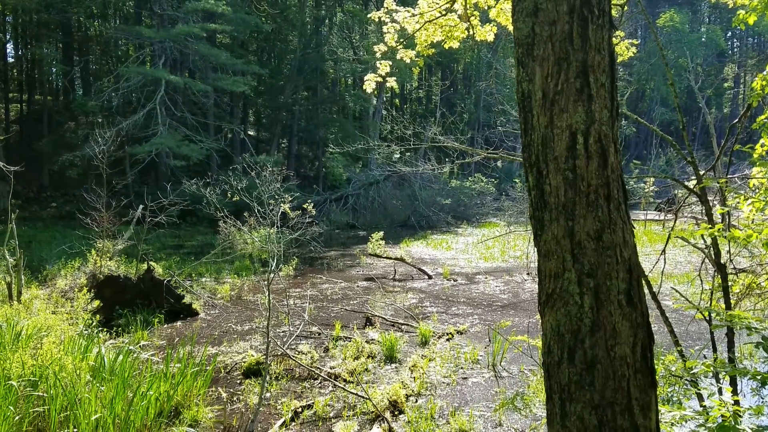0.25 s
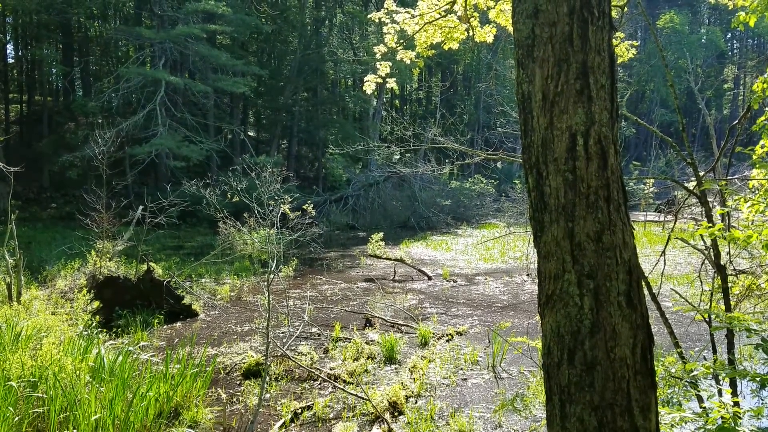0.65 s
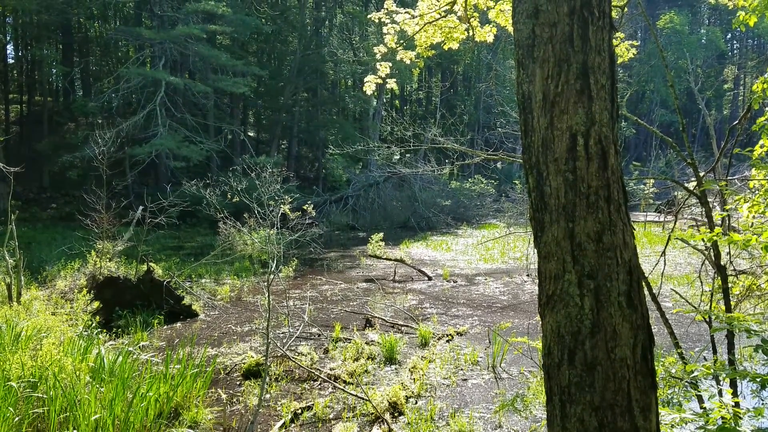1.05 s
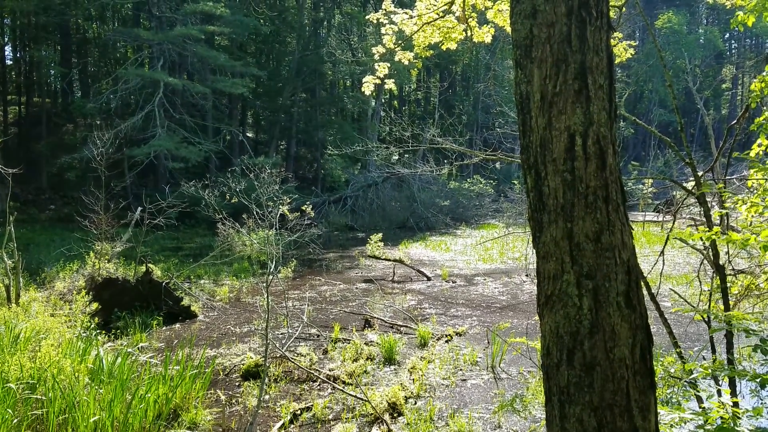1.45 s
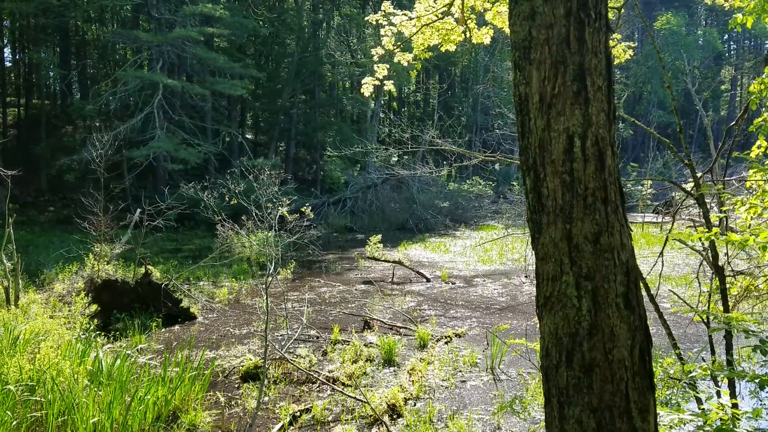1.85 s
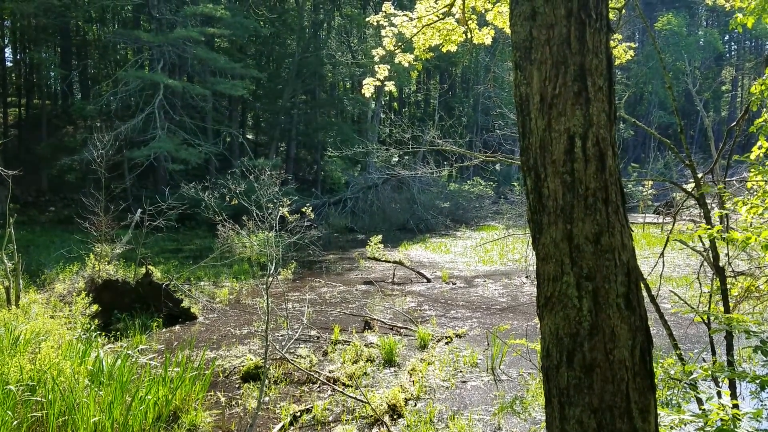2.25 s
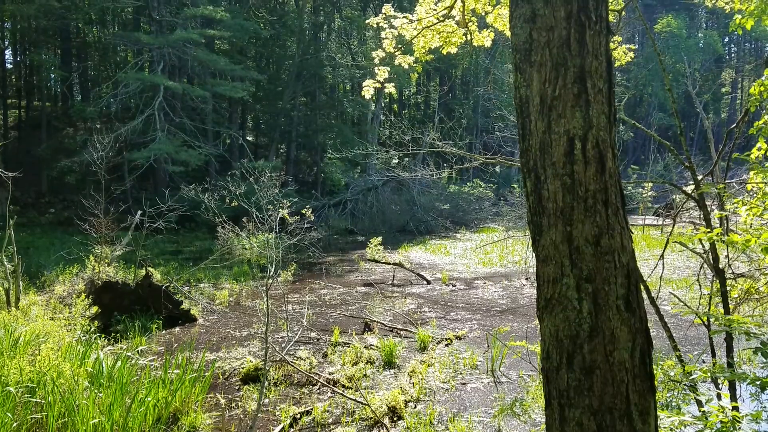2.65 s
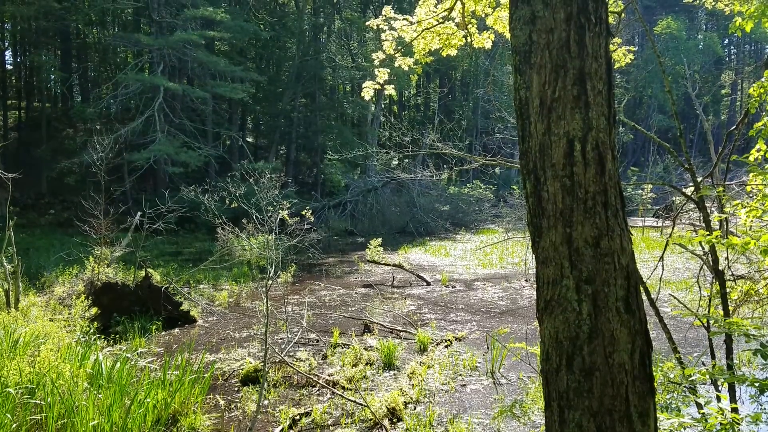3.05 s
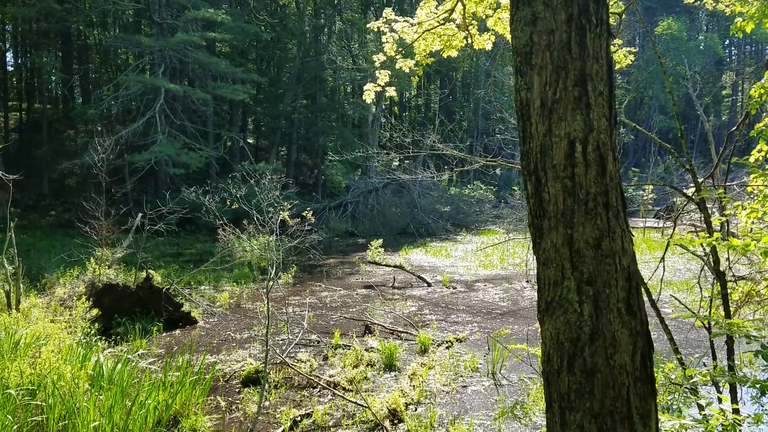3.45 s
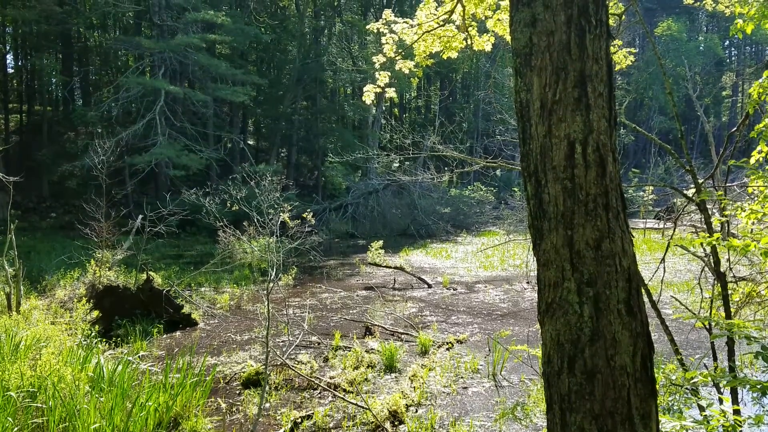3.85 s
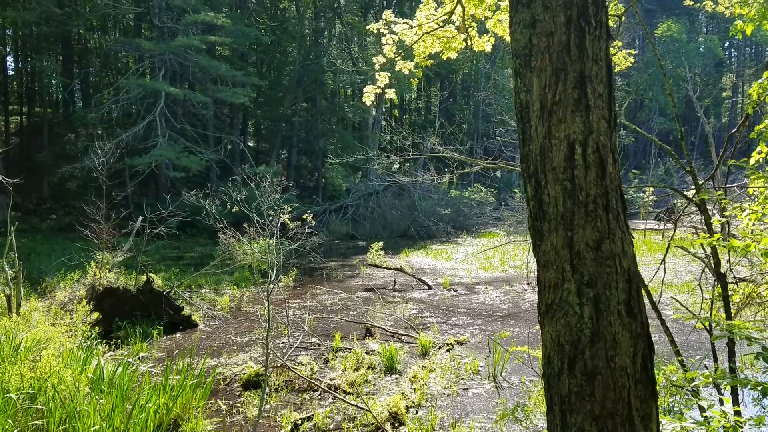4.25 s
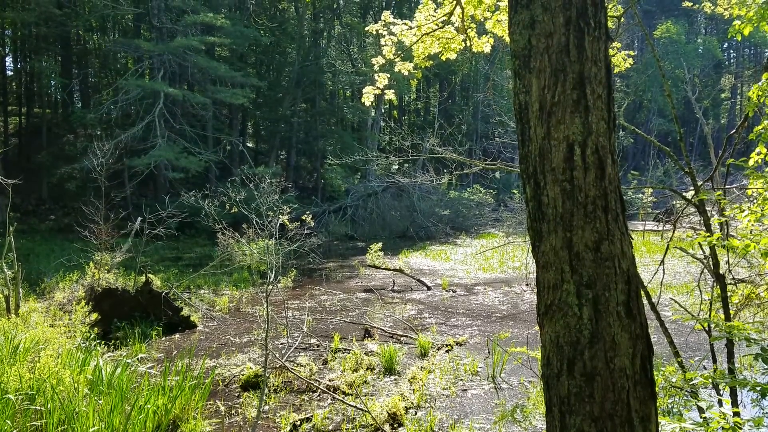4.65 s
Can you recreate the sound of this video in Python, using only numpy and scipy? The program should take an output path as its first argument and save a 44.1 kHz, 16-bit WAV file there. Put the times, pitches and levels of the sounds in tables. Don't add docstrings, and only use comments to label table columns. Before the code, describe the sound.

In a wooded swamp, low airy rumble and soft leaf hiss sit under a faint, wavering propeller-plane drone that grows slightly while its pitch sags. From about 0.35 s a songbird repeats very faint, quick falling notes, about eight a second, with small arched whistles near 0.15 and 0.9 s. A tree frog dominates: thirteen rapid pulses from 1.1 to 1.9 s, starting weakly; seventeen from 2.1 to 3.2 s; eight from 3.6 to 4.0 s. Each pulse is a short, slightly raspy upward chirp near 1 kHz, about fifteen per second, echoing diffusely off trunks. The falling bird notes strengthen from 2.2 to 3.4 s, with irregular chips between 2.0 and 3.6 s. From 3.7 s another bird repeats high hooked whistles with doubled ticks four times a second, and faint distant whistles cluster around 4 to 4.7 s. A tiny dry tick hits the stereo microphone housing at 4.8 s.

```python
import sys
import numpy as np
from scipy import signal
from scipy.fft import next_fast_len
from scipy.io import wavfile

SR = 44100
rng = np.random.default_rng(int(sys.argv[2]) if len(sys.argv) > 2 else 0)


def makeup_ratio(level_db):
    decades = np.asarray(level_db, float) / 20
    return 10 ** decades


def int16_out(signal):
    q = np.round(np.clip(np.atleast_2d(signal).T, -1, 1) * 32767)
    wavfile.write(sys.argv[1], SR, q.astype(np.int16))


N = 217057

# frequency in Hz, density in dB per Hz.
AIR_SPECTRUM = [(20, -23), (120, -13.5), (320, -10.5), (700, -17.5), (2500, -22.5), (6500, -34),
                (10000, -37.5), (15700, -31.5)]
# frequency in Hz, correlation from -1 to 1.
AIR_LIKENESS = [(60, 1), (180, 0.8562), (550, 0.5507), (1650, -0.3509), (4970, 0.2741), (15000, -0.1208)]
# frequency in Hz, left minus right in dB.
AIR_BALANCE = [(60, -7), (240, -4), (950, -2), (3770, 0.5), (15000, -1.5)]
AIR_DB = -63.5
RUMBLE_DB_PER_S = 0.7338
BREEZE_S, BREEZE_WIDTH_S, BREEZE_DB = 2.8957, 1.2428, 2

# time in seconds, rate in Hz.
BLADE_RATE = [(0, 105.1), (2.5, 101.5), (4.92, 94.7)]
# multiple of the blade rate, level in dB, waver in Hz.
DRONE_ORDERS = [(1, 0.5225, 11.19), (2, -16, 36), (3, 0, 11.72), (3.5, 1.5, 19.88)]
# time in seconds, peak in dB, half width in seconds.
EXHAUST_SWELLS = [(.41, -64.5, 0.0321), (.69, -62, 0.0351), (.86, -61, 0.0231), (1.56, -62.5, 0.0348),
                  (1.76, -57, 0.0204), (2.19, -56, 0.0379), (2.29, -53.5, 0.03374), (2.5, -53.5, 0.12123),
                  (2.66, -63, 0.0538), (2.9, -61, 0.1036), (3.13, -56, 0.03617), (3.29, -58.5, 0.02936),
                  (3.48, -57, 0.02138), (3.89, -61.5, 0.028), (4.202, -51, 0.05704), (4.42, -55.5, 0.06793),
                  (4.86, -57, 0.06215)]
FADED_DB = -69.5
DRONE_DB, NEARING_DB_PER_S = -66.5, 1.129

# time in seconds, pitch in Hz, rms level in dB.
ARCHED_WHISTLES = [
    [(0.14, 4067, -90), (0.154, 4490, -68.5), (0.186, 4844, -83), (0.214, 4874, -68.5),
     (0.225, 4890, -84.5)],
    [(0.84, 4233, -73.5), (0.864, 4647, -64.5), (0.882, 4723, -65), (0.896, 4657, -63.5),
     (0.915, 4278, -64.5)],
    [(0.95, 4313, -75), (0.965, 4562, -63), (0.995, 4790, -72), (1.03, 4687, -70.5), (1.09, 4245, -79.5)],
]
# start in seconds, length in seconds, from Hz, to Hz, rms level in dB.
FAR_GLIDES = [(.26, .16, 5650, 5620, -86.5), (1.145, .4, 3230, 3410, -83), (1.5, 0.4945, 3425, 3796, -81.5),
              (1.93, 0.3198, 3759, 3920, -78), (3.96, 0.13784, 3975, 3863, -67.5),
              (3.976, .13, 3686, 3570, -69), (4.19, 0.065, 3571, 3573, -70.5),
              (4.235, 0.0917, 3853, 3688, -69), (4.447, 0.21613, 3333, 3309, -74),
              (4.374, 0.2996, 2775, 2664, -77.5), (4.637, .27, 2376, 2332, -72.5)]

# band centre in Hz, 60 dB decay time in seconds, level in dB.
WOOD_DECAY = [(955.55, 1.1339, -4.5), (1910, 1.1127, 0.8755), (3250.2, 0.9663, 2), (4802.3, 0.8077, 3.5869),
              (7647, 0.3452, 2)]
# resonance in Hz, sharpness (Q), share added.
FROG_OFF_AXIS = [(1051.7, 9.59, -0.4822), (1713.4, 4.724, -0.3233), (2003, 15.814, -0.84135),
                 (2060.8, 11.374, 0.1815)]

# time from the note in ms, pitch in Hz, level in dB, left minus right in dB,
# left lead in radians.
SHORT_SLIDE = [(-13, 6100, -25, -1, .5), (-8, 5400, -6, -1, .5), (0, 4540, 0, -1, .5),
               (9, 3800, -3, -1, .5), (14, 3500, -25, -1, .5)]
SLIDE = [(-30, 8600, -34, 0, .5), (-24, 7600, -16, 0, .5), (-15, 6000, -10, -1, .5), (0, 4540, 0, -1, .5),
         (9, 3750, -3, -1, .5), (15, 3300, -10, -1, .5), (20, 3000, -26, 0, .5)]
CHIP = [(-7, 2380, -25, 0, 1.), (-3, 2410, -3, 0, 1.), (1, 2480, 0, 0, 1.), (4, 2700, -9, 0, 1.),
        (11, 3300, -15, 0, 1.), (15, 3500, -28, 0, 1.)]
TICK = [(-6, 10000, -25, 3, 1.1), (-4, 9400, -4, 3, 1.5), (0, 7900, 0, 3, 2.7), (3, 6900, -2, 3, 3.9),
        (7, 6200, -4, 3, 4.4), (10, 5800, -25, 3, 4.5)]
HOOK_DOWN = [(-75.5, 9900, -35.5, 0, 3.027), (-71, 9000, -7.5, 1.5, 1.47), (-63.5, 6600, -5.5, -5.5, 1.855),
             (-58, 5500, 2.5, -2.5, 5.071), (-45, 4650, -0.5, 1, 4.386), (-31.5, 4050, 7, 3, 5.404),
             (-32.5, 5500, -32, 2.5, 6)]
HOOK_UP = [(-19.5, 3300, -12.5, 12, 5), (-13, 3450, 3.5, 4.5, 4.092), (0, 4220, 1.5, 5, 5.52),
           (13.5, 5200, -0.5, -3.5, 5.255), (28.5, 4900, -37, -7, 5.8)]
FLICK = [(-23, 5600, -25.5, 0, 0.857), (-14.5, 6200, -6, 0.00027, 0.97), (-8, 6620, -1.5, 0.00052, 1.),
         (6, 6720, -1.5, 0.00009, 1.), (11, 5400, -26, 0, 1.)]

# time in seconds, peak level in dB; chips add a pitch ratio.
SHORT_SLIDE_NOTES = [(.357, -74), (.54, -79), (.666, -73), (.797, -71), (.925, -72), (1.06, -78),
                     (1.189, -70), (1.313, -71), (1.438, -64), (1.563, -70), (1.687, -66), (1.815, -67),
                     (1.94, -65), (2.064, -63)]
SLIDE_NOTES = [(2.189, -58), (2.307, -55.5), (2.427, -55.5), (2.545, -53.5), (2.669, -55), (2.791, -54),
               (2.912, -55), (3.032, -53), (3.152, -55), (3.274, -57), (3.395, -56)]
CHIP_NOTES = [
    (2.032, -51.5, 1.0447),
    (2.384, -47.5, 1.0143),
    (2.687, -48.5, 1.0993),
    (2.93, -43.5, 1.1194),
    (3.198, -46, 1.11),
    (3.584, -51, 1.0842),
]
PECK_NOTES = [
    (2.586, -65.5),
]
HOOK_NOTES = [
    (3.67, -64.5),
    (3.912, -59.5),
    (4.151, -58),
    (4.395, -58.5),
    (4.641, -57.5),
    (4.89, -57),
]
TICK_NOTES = [
    (3.753, -71),
    (3.992, -65.5),
    (4.236, -64),
    (4.481, -64.5),
    (4.727, -64),
]
FLICK_NOTES = [
    (3.812, -63),
    (3.903, -61.5),
]
TICK_GAP_S = .0225

# time from the peak in ms, pitch in
# Hz, then fundamental, second and third partial in dB.
PULSE = [(-28, 832.3, -38.5, -27.5, -56), (-23.5, 880, -22.5, -10, -41), (-16, 925, -16.5, -12, -35.5),
         (-9.5, 979.07, -7, -0.5, -23.5), (-4, 1010.1, -5.5, -4, -26.5), (0.0709, 1081.9, -0.5, -16, -26.5),
         (1.7576, 1095.7, -4, -13.5, -29), (3, 1049.4, -20.5, -6.5, -33), (7, 995.6, -60.5, -16.5, -49.5)]
# frequency in Hz, left minus right in dB, left lead in radians.
FROG_SIDE = [(900, -2.5, .8), (1100, -3.5, .8), (1720, 1.5, 1.4), (1900, .6, 2.1), (1990, .6, 2.6),
             (2160, -1.5, 1.3), (3000, -3, 2.2)]
# delay in ms, left level in dB, right level in dB.
FROG_ECHOES = [(4.643, -17.5, -12), (13.612, -12.5, -21.5), (30.807, -18, -23.5)]
# first peak in seconds, number of pulses, steady gap in ms, wait after the first in ms,
# wait before the last in ms.
TRILLS = [
    (1.0856, 13, 64.56, 3.9, 17.6),
    (2.1402, 17, 65.51, 8, 5.1),
    (3.5604, 8, 63.8, 5.2, 2.1),
]
# full level in dB, shortfall at the start in dB, overtones in dB,
# share of the glide in the opening pulse.
EFFORT = [
    (-31, 10, -5, 0.84015),
    (-30.5, 1, -4, .8),
    (-31.5, 0, -6, 0.34623),
]
HURRY_MS, SETTLE_PULSES = 6.7, 1.95
WARM_PULSES, UNEVEN_DB = 2.6, 0.6489
FIRST_DULL_DB, LAST_DULL_DB = 8.5, 1
LAST_PUSH_DB = 0.7936
RISE_FULL, RISE_SHORT = 1.15, .25
HOME_HZ, RASP_DB = 1044.7, 1.6592

# time in seconds, peak level in dB, decay in ms.
HOUSING_TICK = (4.8012, -35.5, .7)


def at_hz(points, hz):
    table_hz, values = np.transpose(points)
    return np.interp(np.log(hz), np.log(table_hz), values)


def rms_one(x):
    return x / np.sqrt(np.mean(np.abs(x) ** 2) + 1e-20)


def drift(rate_hz):
    r = np.exp(-2 * np.pi * rate_hz / SR)
    noise = rng.standard_normal(N + SR)
    return rms_one(signal.lfilter([1], [1, -2 * r, r * r], noise)[SR:])


def add(out, start_s, phase, level_db, pan_db, lead):
    i = round(start_s * SR)
    left = makeup_ratio(level_db + pan_db / 2) * np.sin(phase + lead)
    right = makeup_ratio(level_db - pan_db / 2) * np.sin(phase)
    out[:, i:i + len(phase)] += np.array([left, right])[:, :N - i]


def on_samples(shape):
    ms, *columns = np.transpose(shape)
    fine = np.arange(ms[0], ms[-1], 1000 / SR)
    return ms[0] / 1000, [np.interp(fine, ms, column) for column in columns]


def air(patchy_db):
    t = np.arange(N) / SR
    rumble_db = RUMBLE_DB_PER_S * t
    hiss_db = BREEZE_DB * np.exp(-((t - BREEZE_S) / BREEZE_WIDTH_S) ** 2)
    edges = 20 * 2 ** np.arange(0, 9.9, 1 / 3)
    white = rng.standard_normal((2, 2, N))
    out = 0
    for k, (low, high) in enumerate(zip(edges, edges[1:])):
        band = signal.butter(2, [low, high], "band", fs=SR, output="sos")
        mid, side = signal.sosfilt(band, white[k % 2])
        hz = np.sqrt(low * high)
        alike = np.clip(at_hz(AIR_LIKENESS, hz), -1, 1)
        lean_db = at_hz(AIR_BALANCE, hz) / 2
        bass = at_hz([(400, 1), (1500, 0)], hz)
        swell_db = bass * rumble_db + (1.5 - bass) * hiss_db
        gain = makeup_ratio(at_hz(AIR_SPECTRUM, hz) + swell_db + patchy_db * drift(5.55))
        ports = np.sqrt(1 + alike) * mid + np.sqrt(1 - alike) * side * [[1], [-1]]
        out = out + gain * makeup_ratio(np.array([[lean_db], [-lean_db]])) * ports
    return makeup_ratio(AIR_DB) * out / np.std(out[:, :SR])


def aircraft():
    t = np.arange(N) / SR
    time_s, rate_hz = np.transpose(BLADE_RATE)
    phase = np.cumsum(2 * np.pi * np.interp(t, time_s, rate_hz) / SR)
    swells = sum(makeup_ratio(2 * db) * np.exp(-((t - s) / width) ** 2) for s, db, width in EXHAUST_SWELLS)
    exhaust_db = 10 * np.log10(swells + makeup_ratio(2 * FADED_DB))
    tone = 0
    for multiple, db, waver_hz in DRONE_ORDERS:
        exhaust = multiple == 3
        level_db = exhaust_db if exhaust else DRONE_DB + NEARING_DB_PER_S * t
        blur = 1.0 * exhaust + .3 * (drift(waver_hz) + 1j * drift(waver_hz))
        tone = tone + makeup_ratio(level_db + db) * np.real(blur * np.exp(1j * multiple * phase))
    return np.array([tone, np.roll(tone, 12)]) * makeup_ratio(np.array([[-1.9], [1.9]]))


def whistles(calls, gain_db, flutter_db, lead):
    out = np.zeros((2, N))
    flutter = flutter_db * drift(35.65)
    for rows in calls:
        start_s, (hz, db) = on_samples(np.array(rows) * [1000, 1, 1])
        edge_db = 20 * np.log10(signal.windows.tukey(len(hz), .4) + 1e-4)
        waver_db = flutter[round(start_s * SR):][:len(hz)]
        phase = np.cumsum(2 * np.pi * hz / SR)
        add(out, start_s, phase, db + gain_db + edge_db + waver_db, 0, lead)
    return out


def woods(x, gap_ms, shorten):
    t = np.arange(SR) / SR
    white = rng.standard_normal((2, SR))
    tail = 0
    for hz, t60_s, db in WOOD_DECAY:
        band = signal.butter(2, [hz / 1.5, hz * 1.5], "band", fs=SR, output="sos")
        tail = tail + signal.sosfilt(band, white) * makeup_ratio(db - 60 * t * shorten / t60_s)
    build_up = np.clip(t * 1000 / gap_ms, 0, 1)
    tail = tail * build_up / np.sqrt(np.sum(tail ** 2) / 2)
    return signal.fftconvolve(x, tail, axes=1)[:, :N]


def song(shape, notes):
    out = np.zeros((2, N))
    lead_in, (hz, level_db, pan_db, lead) = on_samples(shape)
    for (s, db, *ratio), chance in zip(notes, rng.standard_normal(len(notes))):
        note_hz = hz * np.prod(ratio) * (1 + 0.006041 * chance)
        add(out, s + lead_in, np.cumsum(2 * np.pi * note_hz / SR), db + level_db, pan_db, lead)
    return out


def pulses():
    rows = []
    for (s, count, gap, first, last), (full_db, short_db, overtones_db, glide) in zip(TRILLS, EFFORT):
        k = np.arange(count)
        opening, closing = k == 0, k == k[-1]
        cold = np.exp(-k / WARM_PULSES)
        gaps_ms = gap - HURRY_MS * np.exp(-k / SETTLE_PULSES) + first * opening + last * np.roll(closing, -1)
        chance = rng.standard_normal((count, 2))
        peak_s = s + (np.cumsum(gaps_ms) - gaps_ms) / 1000
        level_db = full_db - short_db * cold + LAST_PUSH_DB * closing + UNEVEN_DB * chance[:, 0]
        bright_db = overtones_db - FIRST_DULL_DB * opening - LAST_DULL_DB * closing
        held_back = (1 - glide) * opening
        rise = RISE_FULL - RISE_SHORT * cold + .6 * held_back + 0.059844 * chance[:, 1]
        rows += zip(peak_s, level_db, bright_db, rise, 1 - held_back)
    return rows


def frog(pitch_spread):
    out = np.zeros((2, N))
    rows = pulses()
    rasp = RASP_DB * drift(62.0)
    side_hz, *side_columns = np.transpose(FROG_SIDE)
    for (s, db, overtones_db, rise, glide), chance in zip(rows, rng.standard_normal(len(rows))):
        shape = [(min(ms, 0) * rise * .9 + max(ms, 0), *rest) for ms, *rest in PULSE]
        lead_in, (hz, *levels) = on_samples(shape)
        hz = HOME_HZ + (hz - HOME_HZ) * glide
        phase = np.cumsum(2 * np.pi * hz * (1 + pitch_spread * chance) / SR)
        bright_db = overtones_db + 1.6757 + rasp[round(s * SR):][:len(hz)]
        for k, level_db in enumerate(levels):
            pan_db, lead = [np.interp((k + 1) * hz, side_hz, column) for column in side_columns]
            partial_db = db + 0.1446 + level_db + bright_db * (k > 0)
            add(out, s + lead_in, (k + 1) * phase, partial_db, pan_db, lead)
    echoes = 0
    for ms, left_db, right_db in FROG_ECHOES:
        echoes = echoes + makeup_ratio(np.array([[left_db], [right_db]])) * np.roll(out, round(ms * SR / 1000), axis=1)
    return out + echoes


def snap():
    s, db, decay_ms = HOUSING_TICK
    t = np.maximum(np.arange(N) / SR - s, 0) * 1000 / decay_ms
    step = makeup_ratio(db) * (t > 0) * np.exp(-t) * (1 - .7 * t)
    return signal.lfilter([.3], [1, -.7], step)


def scene():
    slider = song(SHORT_SLIDE, SHORT_SLIDE_NOTES) + song(SLIDE, SLIDE_NOTES)
    hooker = song(HOOK_DOWN, HOOK_NOTES) + song(HOOK_UP, HOOK_NOTES)
    second_ticks = [(s + TICK_GAP_S, db) for s, db in TICK_NOTES]
    ticks = makeup_ratio(4.5) * song(TICK, TICK_NOTES + PECK_NOTES + second_ticks)
    far = song(FLICK, FLICK_NOTES) + makeup_ratio(-3.5) * song(CHIP, CHIP_NOTES)
    far = far + whistles(ARCHED_WHISTLES, gain_db=5.0, flutter_db=-0.5, lead=1.3664)
    glides = [[(s, a, db), (s + length, b, db)] for s, length, a, b, db in FAR_GLIDES]
    distant = whistles(glides, gain_db=1.0055, flutter_db=4.5, lead=0.846)
    caller = frog(pitch_spread=0.004662)

    sideways = caller
    for hz, sharp, share in FROG_OFF_AXIS:
        sideways = sideways + share * signal.lfilter(*signal.iirpeak(hz, sharp, fs=SR), caller)
    away = signal.lfilter([2, -3.6, 1.62], [1], slider)
    sent = makeup_ratio(-5.0) * sideways + makeup_ratio(-3.0) * away + makeup_ratio(-4.5) * hooker
    analytic = signal.hilbert(sent, next_fast_len(N))[:, :N]
    sent = np.real(analytic * np.exp(1.5j * drift(8)))
    sent = sent + makeup_ratio(-14) * far + makeup_ratio(-4.5) * distant + makeup_ratio(-6) * ticks
    scatter = woods(sent, gap_ms=20, shorten=1)
    foliage = makeup_ratio(-7) * woods(slider + hooker + far, gap_ms=1, shorten=25)
    calls = caller + slider + hooker + ticks + far + distant
    return calls + scatter + foliage + aircraft() + air(patchy_db=0.7895) + snap()


def top_cut(x):
    return signal.sosfilt(signal.butter(12, 15890, fs=SR, output="sos"), x)


def record(dry):
    mix = dry - .0005
    return top_cut(mix)


dry = scene()
out = record(dry)
int16_out(out)
```